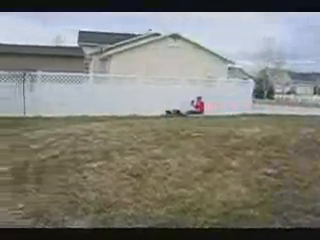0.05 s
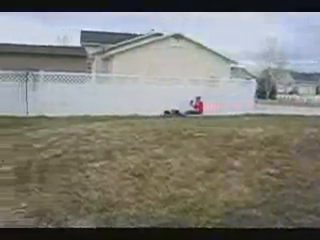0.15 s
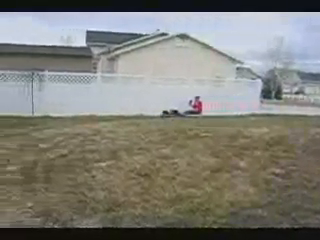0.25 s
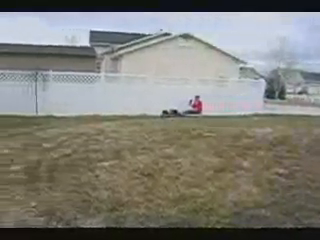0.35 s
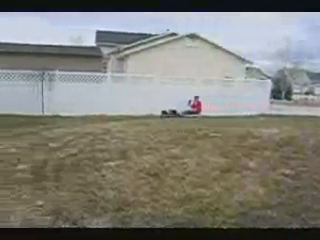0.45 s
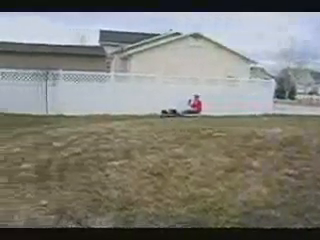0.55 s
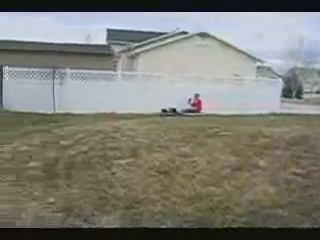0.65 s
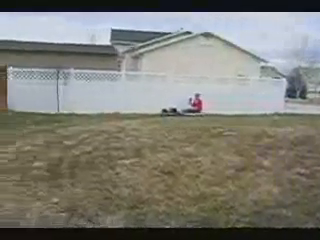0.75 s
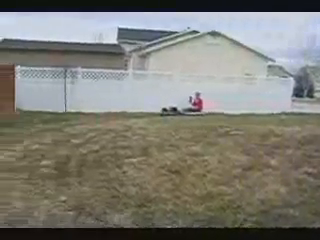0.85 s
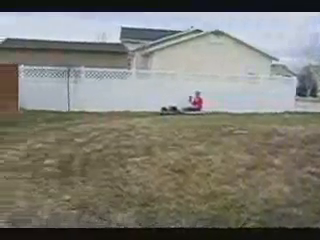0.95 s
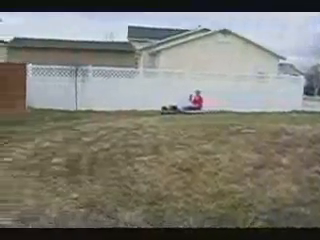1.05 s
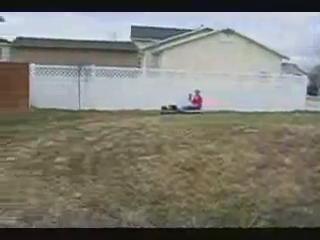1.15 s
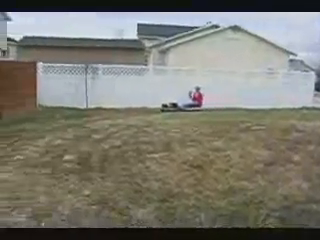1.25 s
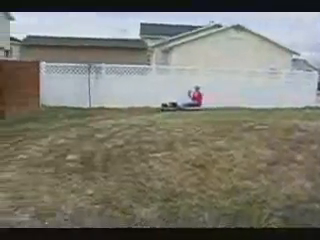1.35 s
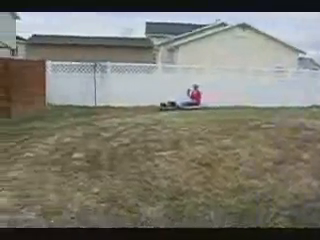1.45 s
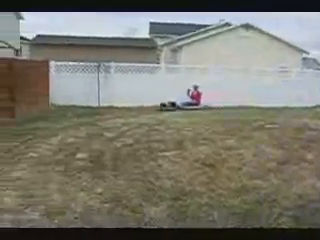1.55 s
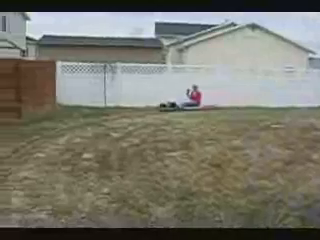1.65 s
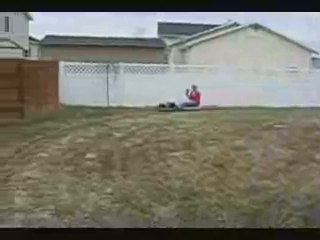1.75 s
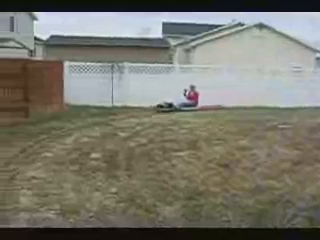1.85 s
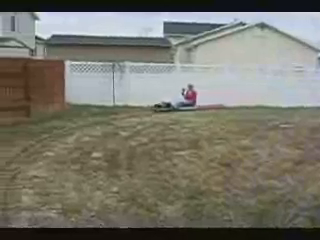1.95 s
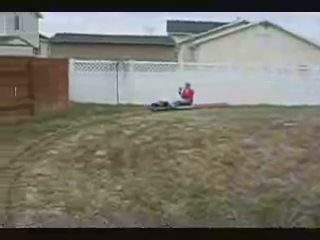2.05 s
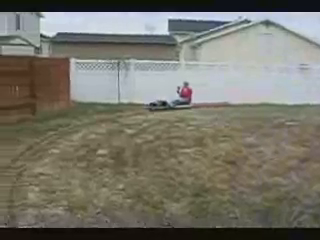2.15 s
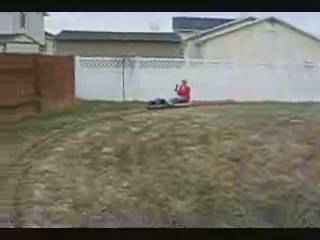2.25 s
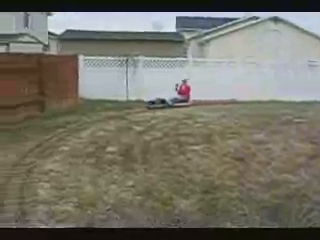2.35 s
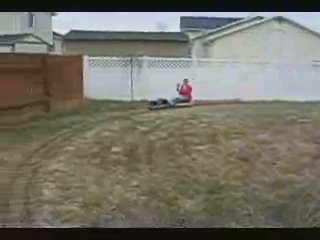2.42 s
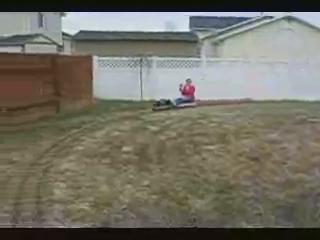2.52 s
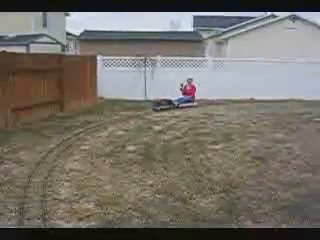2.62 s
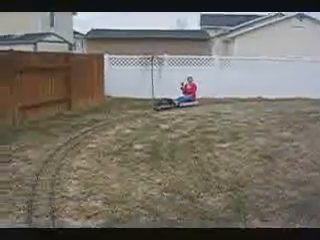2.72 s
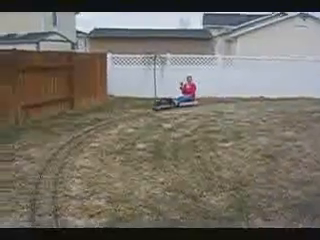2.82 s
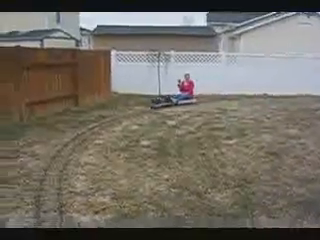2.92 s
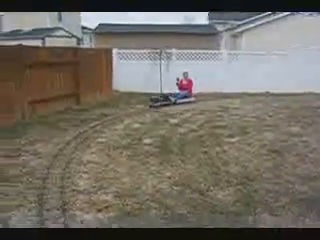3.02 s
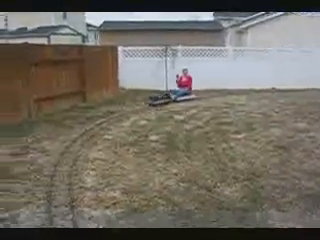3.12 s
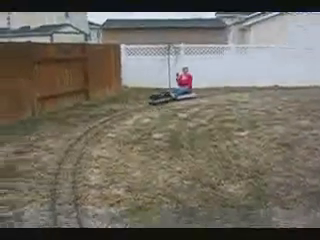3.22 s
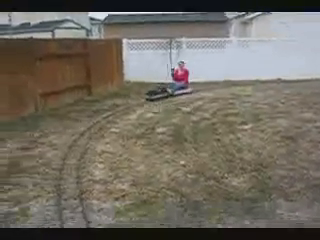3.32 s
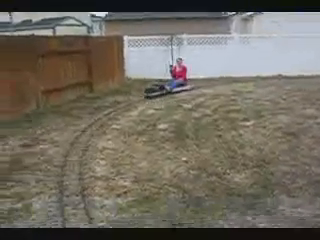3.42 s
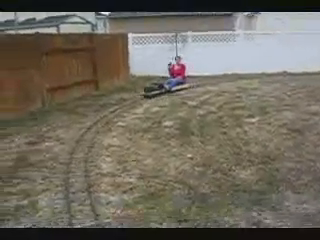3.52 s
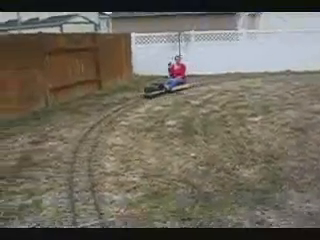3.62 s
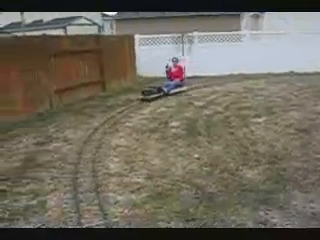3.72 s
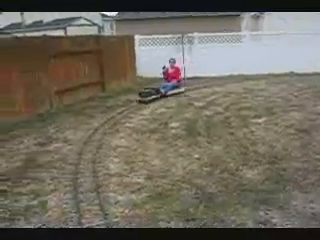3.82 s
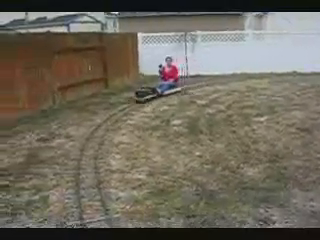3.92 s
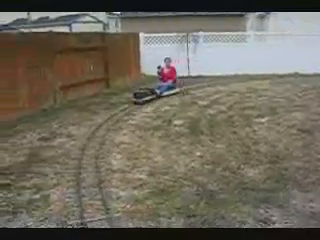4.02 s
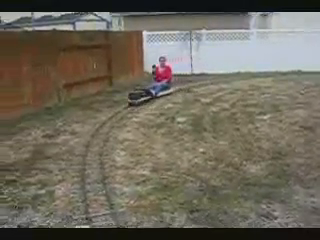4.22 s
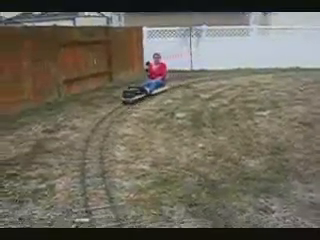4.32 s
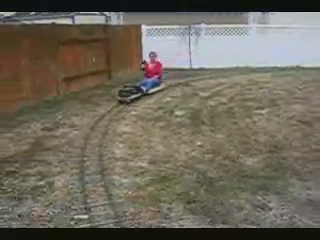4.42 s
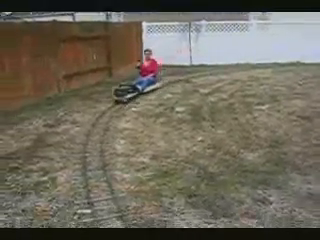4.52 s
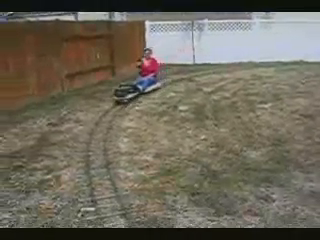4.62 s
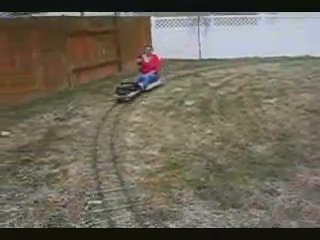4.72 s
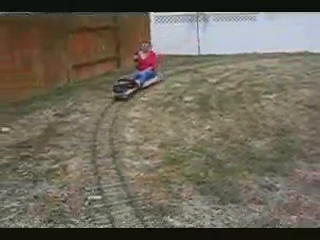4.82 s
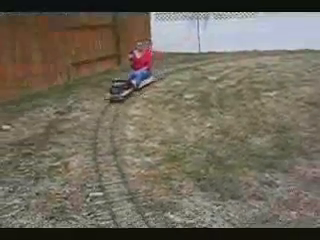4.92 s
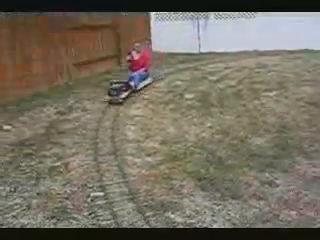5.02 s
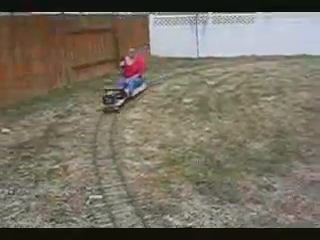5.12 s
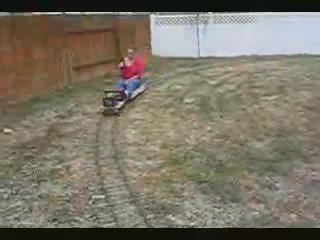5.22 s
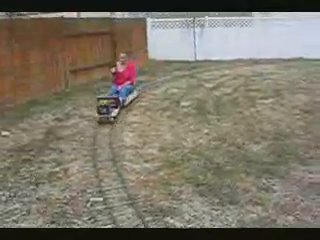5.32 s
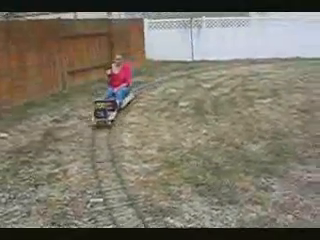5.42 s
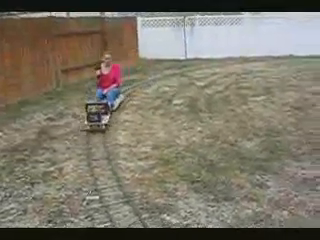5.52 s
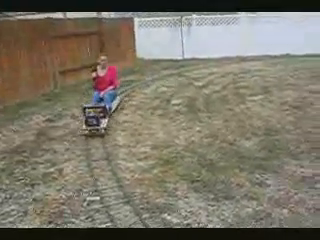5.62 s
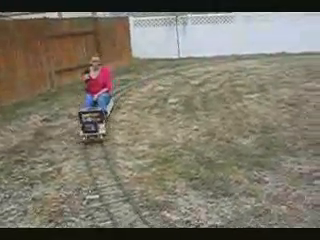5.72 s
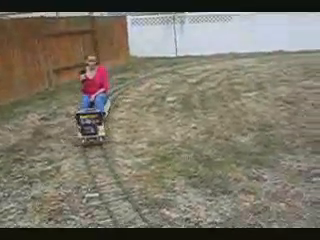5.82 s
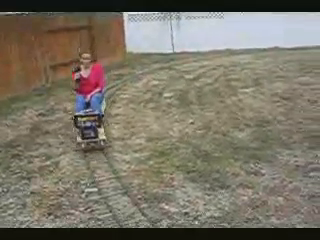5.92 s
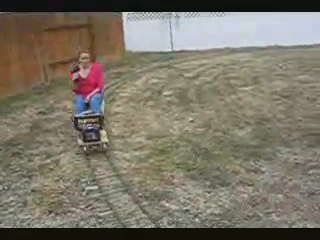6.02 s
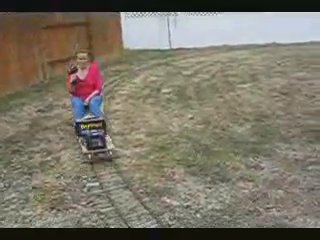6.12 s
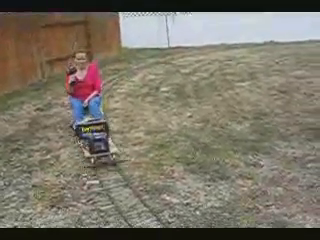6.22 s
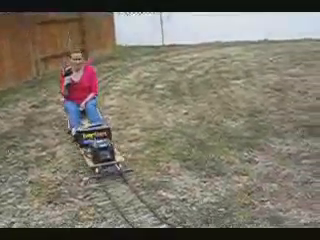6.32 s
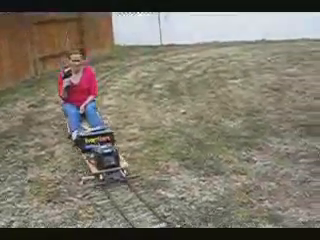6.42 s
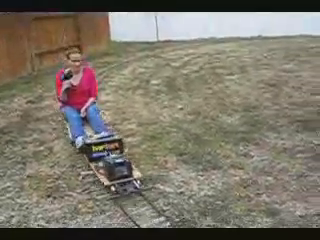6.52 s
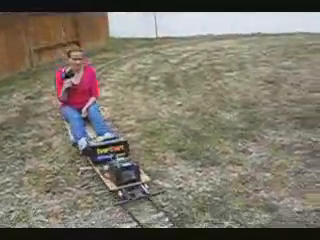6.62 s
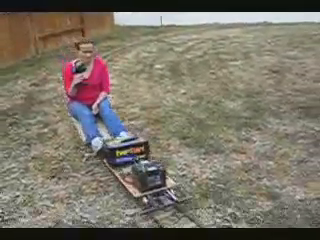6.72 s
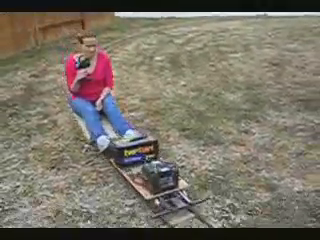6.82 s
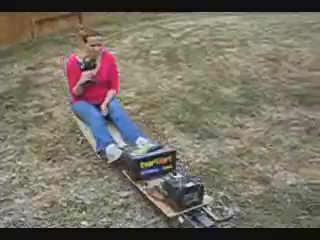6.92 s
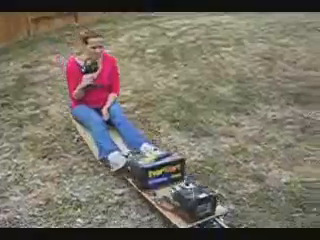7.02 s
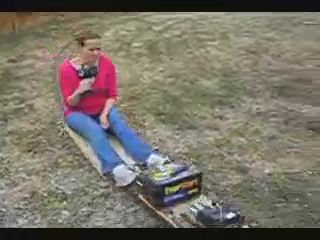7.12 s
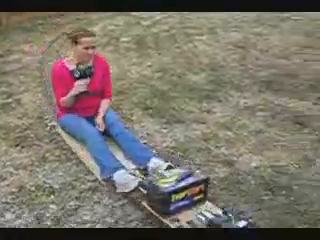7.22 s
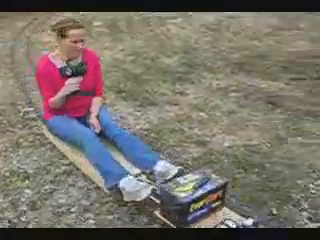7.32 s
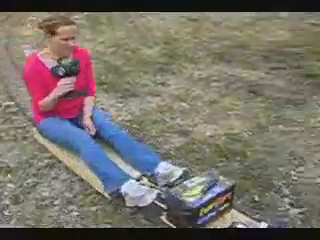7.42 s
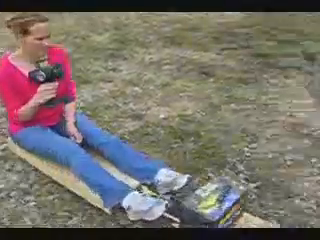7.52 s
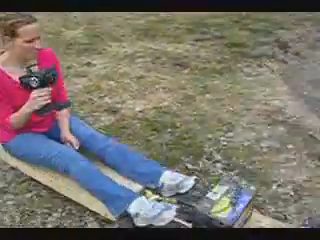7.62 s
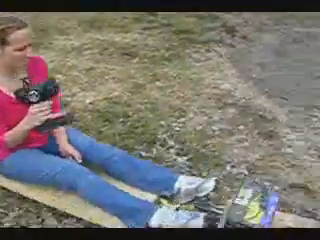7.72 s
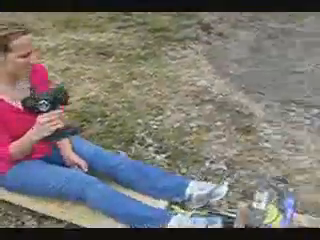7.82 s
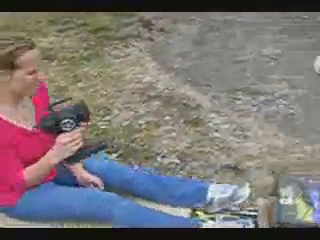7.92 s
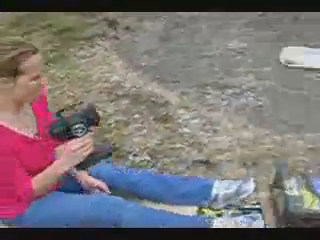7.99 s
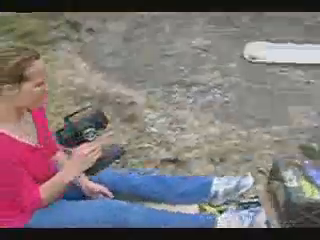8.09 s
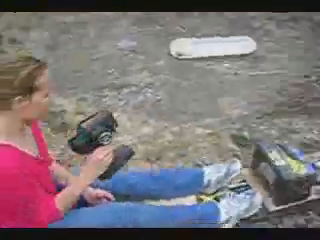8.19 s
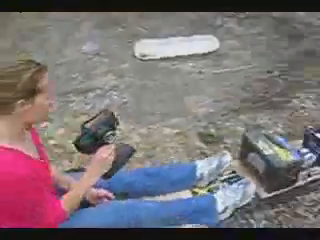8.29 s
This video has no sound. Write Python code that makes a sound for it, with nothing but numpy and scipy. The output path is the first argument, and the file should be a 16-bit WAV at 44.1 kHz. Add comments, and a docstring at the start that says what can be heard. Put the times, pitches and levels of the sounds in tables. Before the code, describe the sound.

A little ride-on rail car starts quiet and far off, its wheels making a rough, mid-pitched rolling noise with fine rattle and metallic grinding. The electric whine throbs gently underneath. It steadily gets louder, then passes very close with irregular hard clacks, boxy deck knocks and howling wheels. The motor drops out just before the end; the mono sound is hissy, muffled in the treble and overloaded at peaks.

```python
"""Garden track: a small battery-driven rail car rolls along it and comes up close to a cheap camera.
Steel wheels roar, ring, grind and howl and the wooden deck rumbles: noise shaped by moving spectra.
The motor whines as a throbbing tone and octave in gear noise; joints clack, thud and rattle as ringing modes.
Far off lie traffic noise and a low hum. The camera sits off zero, clips, cuts the treble and hisses."""
import sys
import numpy as np
from scipy import signal
from scipy.io import wavfile
from scipy.ndimage import uniform_filter1d

SR = 44100
rng = np.random.default_rng(int(sys.argv[2]) if len(sys.argv) > 2 else 0)


def gain_from_db(level_db):
    """Turn a decibel level (scalar or array-like) into a linear amplitude factor."""
    decades = np.asarray(level_db, float) / 20
    return 10 ** decades


def pcm_store(signal):
    """Save signal as 16-bit PCM."""
    levels = np.round(np.clip(np.atleast_2d(signal), -1, 1) * 32767)
    wavfile.write(sys.argv[1], SR, levels.astype(np.int16).T)


N = 368235

# wheels on rail: time_s, roar_db, ring_re_roar_db, flange_grind_re_roar_db
ROLLING = [(0.1, -36.5, -2, -12.5), (0.5, -32, -7, -16.5), (1.15, -30.5, -10, -17), (1.9, -32, -9, -15),
           (2.8, -29.5, -7, -12.5), (3.3, -31, -6, -13.5), (4.2, -29.5, -6.5, -13.5),
           (4.7, -27.5, -5.5, -15.5), (5.02, -28, -4, -13), (5.045, -24.5, -4.5, -10), (5.1, -29.5, -3, -8),
           (5.13, -27.5, -17, -11.5), (5.16, -26, -4, -11), (5.5, -26, -4, -12), (5.8, -24, -6.5, -14),
           (6.4, -20, -14, -15), (6.95, -19.5, -7.5, -17), (7.12, -16, -9, -22.5),
           (7.3, -17.5, -6.5, -20.5), (7.6, -20.5, -12.5, -21), (7.66, -20.5, -14, -22),
           (7.82, -19.5, -9.5, -20.5), (7.9, -23.5, -7.5, -15.5), (8.08, -19.5, -8, -19),
           (8.3, -23.5, -5.5, -18)]
# roar spectrum, relative density: freq_hz, density_db
ROAR_SPECTRUM = [(250, -36.5), (420, -2.5), (560, 0), (800, 2.5), (1000, 2), (1300, 1.5), (1650, -2),
                 (2200, -6), (2800, -35)]
# flange grind spectrum, relative density: freq_hz, density_db
GRIND_SPECTRUM = [(2200, -24), (2500, -2), (2800, 1), (3100, 3.5), (3350, 1), (3650, -5.5), (3950, -11.5),
                  (4550, -12.5), (5050, -23), (5500, -52)]
# wheel ring band: time_s, centre_hz, width_hz
RING = [(0, 1990, 303), (2.5, 2055, 290), (4.5, 2030, 260), (5.3, 2080, 197), (6.3, 2050, 263),
        (6.9, 2190, 203), (7.3, 2110, 201), (7.7, 2050, 261), (8.35, 2040, 300)]
# wheel howl band: time_s, centre_hz, level_db, width_hz
HOWL = [(0.1, 690, -35.5, 187), (0.45, 680, -38, 165), (1.0, 707, -33, 125), (1.7, 676, -27.5, 107.4),
        (2.4, 725, -31.5, 109), (2.8, 670, -29, 109), (3.4, 685, -32, 104), (4.3, 773, -32, 110),
        (4.6, 710, -34.5, 108), (5.2, 736, -28.5, 97), (5.75, 807, -31, 74.7), (6.4, 884, -19, 71),
        (6.75, 850, -21, 71), (7.15, 877, -17, 71.4), (7.46, 955, -23.5, 80.1), (7.58, 920, -25, 100),
        (7.66, 793, -28.5, 95.3), (7.9, 740, -20.5, 147.7), (8.08, 766, -23.5, 151), (8.22, 727, -17, 152),
        (8.3, 745, -21, 150)]
# wooden deck resonance: time_s, centre_hz, level_db
RUMBLE = [(0.1, 257, -43), (0.45, 262, -43.5), (1.0, 275, -41.5), (2.9, 325, -39.5), (3.5, 355, -38.5),
          (3.75, 361, -34.5), (4.25, 365, -40.5), (4.6, 346, -43.5), (5.3, 315, -37.5), (5.9, 306, -33),
          (6.75, 326, -33), (7.3, 339, -26.5), (7.45, 385, -21), (7.52, 395, -26), (7.6, 410, -19),
          (7.67, 422, -26.5), (7.75, 438, -20.5), (7.8, 455, -23), (7.835, 470, -16), (7.91, 453, -20),
          (7.98, 446, -19), (8.03, 430, -19.5), (8.08, 412, -15), (8.13, 367, -18.5), (8.17, 345, -16.5),
          (8.22, 353, -19.5), (8.26, 376, -14.5), (8.3, 366, -16.5)]
# rail modes: freq_hz, level_db, t60_s
RAIL_MODES = [(365, -13, 0.047), (610, -0.5, 0.03), (1030, 3, 0.022), (1360, 5, 0.016), (1680, 14, 0.012),
              (2050, 10, 0.013), (2490, 8, .008), (3170, -2.5, 0.007), (3800, -5.5, 0.005),
              (4450, -12, 0.0023)]
# motor, levels at the crest of a throb: time_s, commutator_hz, tone_db, octave_db
MOTOR = [(0.0, 480.5, -45, -57), (0.45, 473, -52.5, -48), (0.85, 468, -41.5, -52), (1.15, 464.1, -55, -42),
         (1.33, 460.9, -38, -48), (1.5, 460, -41, -57), (1.9, 459, -38.5, -46), (2.45, 449, -43.5, -47.5),
         (2.65, 446.1, -38, -52), (2.95, 446, -47, -54), (3.12, 444.5, -42.5, -54), (3.28, 444, -35, -53),
         (3.45, 443, -52, -55), (3.6, 442, -31.5, -36), (4.15, 434, -43.5, -45.5),
         (4.45, 431.4, -28, -36.5), (4.62, 429, -39, -46), (4.75, 431.2, -44.5, -35.5),
         (5.25, 429.7, -34, -40.5), (5.92, 429, -32, -25.5), (6.4, 425.1, -29, -31),
         (6.64, 425, -28, -22.5), (7.0, 439.7, -32, -19.5), (7.031, 440.5, -26.5, -32),
         (7.041, 441, -31.5, -14.5), (7.12, 443.2, -31.5, -16), (7.2, 443.7, -19, -24.5),
         (7.41, 445, -27.5, -17.5), (7.45, 444.6, -21.5, -22), (7.62, 445, -17.5, -29.5),
         (7.66, 448, -31.5, -41), (7.72, 439, -14, -40), (7.79, 446.5, -32, -30), (7.96, 445, -22.5, -42)]
# gear noise band above the motor's octave: time_s, centre_hz, level_db
UPPER_GEARS = [(0, 1295, -55), (4.8, 1263, -37), (5.15, 1273, -39.5), (5.8, 1242, -34.5),
               (6.3, 1228, -29.5), (6.8, 1204, -35.5), (7.1, 1136, -27.5), (7.4, 1303, -22),
               (7.58, 1190, -21.5), (7.68, 1254, -26.5), (7.8, 1280, -24.5), (7.96, 1193, -41.5)]
# wheels over rail joints, level before the high-pass:
# start_s, peak_db, decay_s, brightness (0 dull, 1 plain, above 1 sharp)
CLACKS = [(0.061, -28, .008, 1.4), (0.187, -26, 0.014, 1.75), (0.377, -24, .004, 1.3),
          (2.426, -20, 0.013, 0.76), (5.04, -14, 0.0035, 1.3), (5.05, -18, 0.005, 1),
          (5.066, -17.5, 0.0019, 1.2), (5.085, -20.5, 0.0035, 1.1), (5.787, -24, 0.0043, 0.98),
          (7.039, -11, 0.0094, 0.51), (7.091, -19.5, 0.0086, 0.4), (7.238, -15, 0.0036, 0.66),
          (7.392, -22, 0.0076, 0.56), (7.575, -19, 0.0072, 0.62), (7.618, -10.5, 0.011, 0.91),
          (7.705, -6.5, 0.002, 0.089), (7.815, -8.5, 0.025, 0.5), (7.878, -4, 0.0016, 0.55),
          (7.955, -8.5, 0.013, 0.55), (8.061, -5, 0.01, 0.38), (8.081, -9.5, 0.014, 0.39),
          (8.154, -14, .01, 0.68), (8.246, -6.5, 0.011, 0.32), (8.271, -14, 0.003, 0.65),
          (8.313, -11.5, 0.0051, 0.7)]
# deck bumps as wheels drop on a joint: start_s, level_db, pitch_hz, t60_s
THUDS = [(0.194, -17, 261, .04), (0.845, -13, 758, 0.037), (7.83, -8, 557, .06), (8.036, -10, 260, .04),
         (8.079, -10, 199, 0.031), (8.155, -13, 252, 0.11), (8.246, -6, 710, 0.031),
         (8.272, -5.5, 295, 0.03), (8.308, -10.5, 243, 0.036)]
# sharp wide-band ticks: start_s, peak_db, ratio_per_sample (below 0 thin, towards 1 dull)
TICKS = [(7.012, -34, .1), (7.147, -27, 0.42), (7.362, -35, 0.098), (7.370, -34.5, -.6), (7.385, -39, -.7),
         (7.626, -18, 0.77), (7.879, -27.5, -.1), (8.2794, -36.5, .4)]
# distant traffic level: time_s, level_db
TRAFFIC_LEVEL = [(0.1, -48.5), (2.2, -49.5), (2.7, -46.5), (3.7, -50.5), (5.5, -48), (7.0, -49.5),
                 (8.3, -38.5)]
# distant traffic spectrum, relative density: freq_hz, density_db
TRAFFIC_SPECTRUM = [(25, -23), (60, -16), (100, -1.5), (160, 7), (230, 4), (330, -26.5)]
# distant low hum: time_s, pitch_hz, level_db
HUM = [(0.0, 68.64, -43.5), (1.15, 70.86, -46), (1.32, 70.1, -48.5), (1.43, 70.3, -44), (1.68, 70, -50),
       (2.0, 69.5, -43), (2.09, 65.6, -57), (2.3, 65, -62), (2.4, 63.7, -55), (2.58, 63.4, -53),
       (2.7, 64.2, -49), (2.84, 63.7, -47), (2.92, 59.7, -57), (3.85, 60.4, -54), (4.0, 59.7, -55),
       (4.35, 59.4, -53), (4.43, 61.4, -46), (4.54, 66.9, -46), (4.62, 80.4, -61), (4.8, 89.4, -72),
       (4.97, 94.6, -57.5), (5.5, 100.8, -54.5), (6.05, 97.6, -69), (6.2, 92.4, -53), (6.9, 92, -58),
       (7.65, 84.5, -57.5), (7.85, 84.7, -77)]

MOTOR_FADE_S = 0.082


def evened(x):
    """Scales to rms 1."""
    return x / np.sqrt(np.mean(x ** 2) + 1e-20)


def read_spectrum(points, hz):
    """Interpolates a spectrum in dB on a log-frequency axis."""
    f, value = np.transpose(points)
    return np.interp(np.log(hz + 1), np.log(f + 1), value)


def columns(rows, t):
    """Joins the rows of a curve by straight lines."""
    s, *values = np.transpose(rows)
    return [np.interp(t, s, v) for v in values]


def resonate(x, hz, width_hz):
    """Steep moving resonance: shifts the curve hz to zero, smooths twice, shifts back."""
    turn = np.exp(2j * np.pi * np.cumsum(hz) / SR)
    r = np.exp(-np.pi * width_hz / SR)
    smooth = signal.lfilter([(1 - r) ** 2], [1, -2 * r, r * r], x / turn)
    return 2 * (turn * smooth).real


def wander(span_s):
    """Slow random curve of rms 1: noise averaged twice over span_s."""
    size = int(span_s * SR) + 1
    once = uniform_filter1d(rng.standard_normal(N), size)
    return evened(uniform_filter1d(once, size))


def high_pass(x, order, hz):
    """Butterworth high-pass: takes out the bass below hz."""
    return signal.sosfilt(signal.butter(order, hz, "high", fs=SR, output="sos"), x)


def bell(hz, centre_hz, width_hz):
    """Power of a resonance bell-shaped in log pitch, so steeper on its low side."""
    octave_like = np.log((hz + 1) / centre_hz)
    return np.exp(-.5 * (octave_like * centre_hz / np.maximum(width_hz, 20)) ** 2)


def wheels(patchy_db=1.43, flutter_db=1.5):
    """Roar, ring, grind, howl, deck rumble and far traffic: one field of random short-time spectra."""
    frames = N // 256 + 5
    hz = np.fft.rfftfreq(1024, 1 / SR)[:, None]
    t = np.arange(frames) * 256 / SR
    roar_db, ring_db, grind_db = columns(ROLLING, t)
    ring_hz, ring_width_hz = columns(RING, t)
    howl_hz, howl_db, howl_width_hz = columns(HOWL, t)
    rumble_hz, rumble_db = columns(RUMBLE, t)
    traffic_db = columns(TRAFFIC_LEVEL, t)[0]

    # howl and grind flutter independently
    flutter = uniform_filter1d(rng.standard_normal((frames, 2)), size=5, axis=0)
    howl_flutter_db, grind_flutter_db = evened(flutter).T * flutter_db
    rumble_width_hz = 52 + 28.5 * np.maximum(t - 6.7, 0)  # widens as the car passes, from 6.7 s
    deck = 1 / (1 + (225 / (hz + 1)) ** 10)  # a small board radiates no deep bass

    layers = [
        (gain_from_db(read_spectrum(ROAR_SPECTRUM, hz)) ** 2, roar_db),
        (bell(hz, ring_hz, ring_width_hz), roar_db + ring_db),
        (gain_from_db(read_spectrum(GRIND_SPECTRUM, hz)) ** 2, roar_db + grind_db + grind_flutter_db),
        (bell(hz, howl_hz, howl_width_hz), howl_db + howl_flutter_db),
        (bell(hz, rumble_hz, rumble_width_hz) * deck, rumble_db),
        (gain_from_db(read_spectrum(TRAFFIC_SPECTRUM, hz)) ** 2, traffic_db)]
    power = sum(shape / shape.sum(0) * gain_from_db(db) ** 2 for shape, db in layers)

    a, b, patches = rng.standard_normal((frames, 513, 3)).T
    patches = uniform_filter1d(patches, size=4, axis=0)  # over frequency
    patches = evened(uniform_filter1d(patches, size=14, axis=1))  # over time
    z = (a + 1j * b) * np.sqrt(power) * gain_from_db(patchy_db * patches)
    # sqrt(1.5) makes up the loss where unrelated frames overlap
    rolling = signal.istft(z, nperseg=1024, noverlap=768)[1][:N] * np.sqrt(1.5)
    return roughen(rolling)


def roughen(rolling, judder_db=0.72, jolts_per_s=45, jolt=0.13, jolt_s=0.0085, treble_hz=2200):
    """Rail roughness: a judder in all bands, and small jolts that flare in the treble and die away."""
    bumps = (rng.random(N) < jolts_per_s / SR) * np.minimum(rng.exponential(1, N), 2.5)
    jolts = signal.lfilter([jolt], [1, -np.exp(-1 / (jolt_s * SR))], bumps)
    sos = signal.butter(2, treble_hz, "high", fs=SR, output="sos")
    treble = signal.sosfiltfilt(sos, rolling)
    return (rolling + treble * (evened(1 + jolts) - 1)) * gain_from_db(judder_db * wander(0.029))


def rattle(per_s=250, spread_db=3, re_roar_db=-12, detune=.12):
    """Tiny uneven wheel-on-rail knocks, each ringing one mode at or off pitch; level follows the roar."""
    size = gain_from_db(spread_db * np.minimum(rng.exponential(1, N), 3)) * (rng.random(N) < per_s / SR)
    modes = 3 * RAIL_MODES  # flat, true and sharp copies
    which = rng.integers(0, len(modes), N)
    t, out = np.arange(2000) / SR, np.zeros(N)
    for k, (hz, db, t60_s) in enumerate(modes):
        tuned_hz = hz * (1 + detune * (k // len(RAIL_MODES) - 1))
        tap = gain_from_db(db / 2 - 60 * t / t60_s) * np.sin(2 * np.pi * tuned_hz * t)
        out += signal.oaconvolve(size * (which == k), tap)[:N]
    out = signal.sosfilt(signal.butter(4, [450, 3300], "band", fs=SR, output="sos"), out)
    roar_db = columns(ROLLING, np.arange(N) / SR)[0]
    return gain_from_db(roar_db + re_roar_db) * evened(out)


def throb_db(t, period_s=0.6, first_dip_s=0.17, dip_db=-5, sharpness=2.9, end_s=7.0):
    """Steady throb of the whine: 0 dB at the crest, one dip per period, until the car is close."""
    dips = abs(np.cos(np.pi * (t - first_dip_s) / period_s)) ** (2 * sharpness)
    return dip_db * dips * np.clip((end_s - t) / MOTOR_FADE_S, 0, 1)


def motor(waver_hz=2.155, tremble_db=1.26, gear_db=-1, fuzz_db=-12):
    """Wavering, throbbing commutator tone and its octave; gear noise round both and in a band above."""
    t = np.arange(N) / SR
    hz, tone_db, octave_db = columns(MOTOR, t)
    upper_hz, upper_db = columns(UPPER_GEARS, t)
    fade = np.clip(1 + (MOTOR[-1][0] - t) / MOTOR_FADE_S, 0, 1)
    phase = 2 * np.pi * np.cumsum(hz + waver_hz * wander(0.028)) / SR

    fuzz = evened(resonate(rng.standard_normal(N), hz, width_hz=40))
    gears = evened(resonate(rng.standard_normal(N), 2 * hz, width_hz=55))
    upper = evened(resonate(rng.standard_normal(N), upper_hz, width_hz=220))
    tone = np.sqrt(2) * np.sin(phase) + gain_from_db(fuzz_db) * fuzz
    octave = np.sqrt(.5) * np.sin(2 * phase) + gain_from_db(gear_db) * gears
    tone_gain = gain_from_db(tone_db + throb_db(t) + tremble_db * wander(0.023))
    return fade * (tone_gain * tone + gain_from_db(octave_db) * octave + gain_from_db(upper_db) * upper)


def clacks():
    """Wheels over rail joints: each a short gritty knock that rings the rail modes."""
    t, out = np.arange(4000) / SR, np.zeros(N + 8000)
    grit = rng.standard_normal((len(CLACKS), len(t)))
    pitch = 1 + 0.061 * rng.standard_normal(len(CLACKS))  # no two joints ring alike
    for (start_s, peak_db, decay_s, bright), noise, tune in zip(CLACKS, grit, pitch):
        knock = noise * np.exp(-t / max(decay_s, .001)) * np.clip(t / 0.001, 0, 1)
        ring = np.zeros(len(t))
        for hz, db, t60_s in RAIL_MODES:
            tilt_db = 70 * (bright - 1) * np.log10(hz / 1500)  # bright favours upper modes
            ring += gain_from_db(db - 60 * t / t60_s + tilt_db) * np.sin(2 * np.pi * hz * tune * t)
        sound = signal.fftconvolve(knock, ring)
        out[round(start_s * SR):][:len(sound)] += gain_from_db(peak_db) * sound / abs(sound).max()
    return high_pass(out[:N], 4, 260)


def thuds(rise_s=0.0075):
    """Wheels dropping on a joint: each one soft-edged dying swing of the deck board."""
    t, out = np.arange(6000) / SR, np.zeros(N + 6000)
    for start_s, level_db, hz, t60_s in THUDS:
        envelope = gain_from_db(level_db - 60 * t / t60_s) * (1 - np.exp(-t / rise_s))
        out[round(start_s * SR):][:len(t)] += envelope * 2 * np.sin(2 * np.pi * hz * t)
    return high_pass(out[:N], 4, 150)


def ticks(fizz_s=7.625, fizz_spread_s=.028, fizz_gain_db=-66):
    """Spikes a fraction of a millisecond long, first swing down; faint treble fizz round the largest."""
    out, after = np.zeros(N), np.arange(40)
    for start_s, peak_db, ratio in TICKS:
        out[round(start_s * SR):][:40] -= gain_from_db(peak_db) * np.clip(ratio, -.9, .9) ** after
    t = np.arange(N) / SR
    fizz = evened(resonate(rng.standard_normal(N), np.full(N, 6000), width_hz=1500))
    swell = np.exp(-.5 * ((t - fizz_s) / fizz_spread_s) ** 2)
    return out + gain_from_db(fizz_gain_db) * swell * high_pass(fizz, 6, 5200)


def hum(clean_until_s=1.9, roughens_s=.3, rough_share=.4, width_hz=10):
    """Far-off engine-like low tone: sinks, turns partly to narrow noise, climbs and dies away."""
    t = np.arange(N) / SR
    hz, level_db = columns(HUM, t)
    rough = rough_share * np.clip((t - clean_until_s) / roughens_s, 0, 1)
    tone = np.sqrt(2 - 2 * rough) * np.sin(2 * np.pi * np.cumsum(hz) / SR)
    fuzz = np.sqrt(rough) * evened(resonate(rng.standard_normal(N), hz, width_hz))
    return (t < HUM[-1][0]) * gain_from_db(level_db + 1.6 * wander(0.08)) * (tone + fuzz)


def scene():
    """Car, traffic and hum summed at the microphone, one channel."""
    return (wheels() + rattle() + motor() + clacks() + thuds() + hum())[None]


def roll_off(x):
    """The treble ends steeply here."""
    return signal.sosfilt(signal.butter(12, 12550, fs=SR, output="sos"), x)


def record(dry, offset=-.0555, ceiling=.71, edge_hz=5070, hiss_gain_db=-54.0, hiss_hz=6300):
    """Camera: offset, hard ceiling, treble cut, high hiss that follows the loudness, ticks."""
    clipped = np.clip(dry + offset, -ceiling, ceiling) - offset
    fir = signal.firwin(181, edge_hz, window=("kaiser", 9), fs=SR)
    low = signal.oaconvolve(clipped, fir[None], "same")
    loudness = np.sqrt(abs(uniform_filter1d(low ** 2, size=1500)))
    rising_noise = np.diff(rng.standard_normal(N + 2), n=2)
    hiss = signal.sosfilt(signal.cheby2(10, 40, hiss_hz, "high", fs=SR, output="sos"), rising_noise)
    full = low + gain_from_db(hiss_gain_db) * loudness * hiss + ticks() + offset
    return roll_off(full)


dry = scene()
out = record(dry)
pcm_store(out)
```